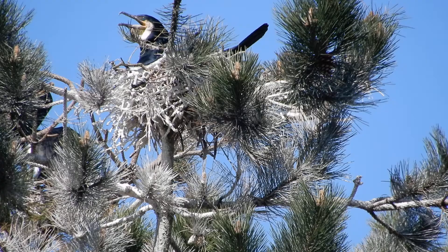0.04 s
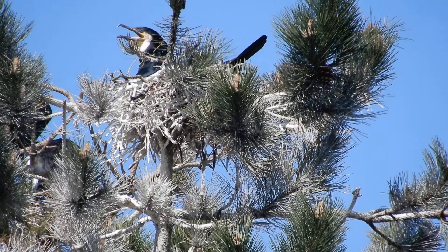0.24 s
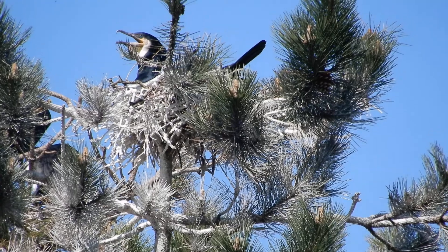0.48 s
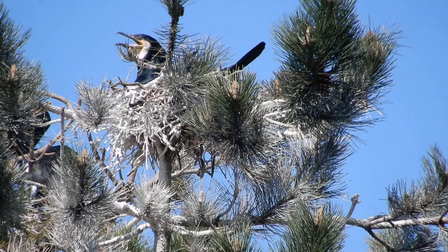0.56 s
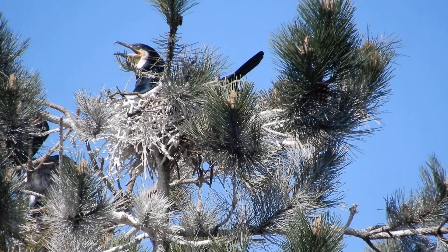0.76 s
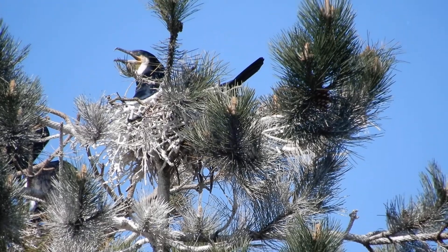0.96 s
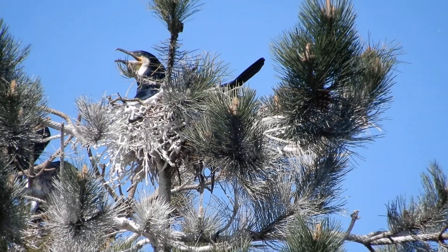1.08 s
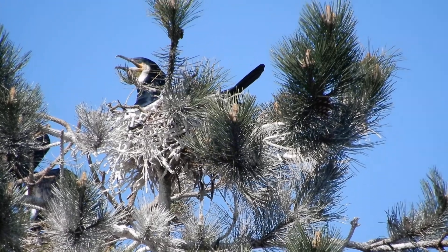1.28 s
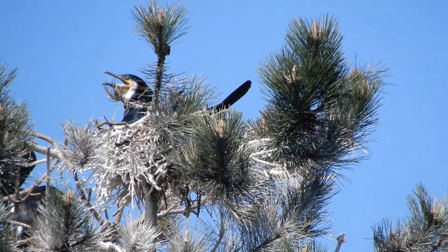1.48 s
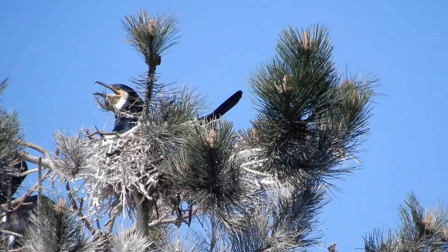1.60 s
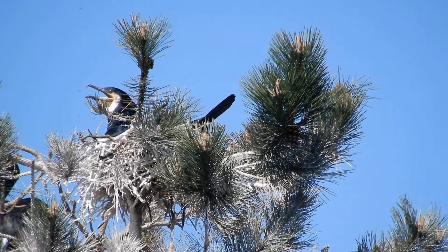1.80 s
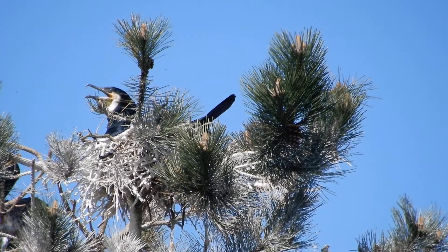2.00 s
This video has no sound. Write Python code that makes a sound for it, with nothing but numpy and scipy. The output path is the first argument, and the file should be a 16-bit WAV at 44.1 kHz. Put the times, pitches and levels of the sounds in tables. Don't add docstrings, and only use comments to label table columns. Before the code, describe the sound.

Wind buffeting dominates, low and fluttering, after a tiny click at the start. Behind it distant waterbirds croak in a quick row, then a softer row, over faint recorder whir, small handling ticks and thin bird peeps.

```python
import sys
import numpy as np
from scipy import signal
from scipy.io import wavfile
from scipy.ndimage import uniform_filter1d

SR = 44100
rng = np.random.default_rng(int(sys.argv[2]) if len(sys.argv) > 2 else 0)


def to_linear_factor(level_db):
    exponent = np.asarray(level_db, float) / 20
    return 10 ** exponent


def dump(signal):
    limited = np.clip(np.atleast_2d(signal).T, -1, 1)
    pcm = np.round(limited * 32767).astype(np.int16)
    wavfile.write(sys.argv[1], SR, pcm)


N = 90184

# centre_hz, width_hz, level_db
WHIR_MODES = [(889, 216, -61.5), (1244, 57, -73.5), (1920, 380, -72), (2509, 60, -72), (3873, 210, -66),
              (4120, 210, -85), (4540, 210, -87.5)]
# start_s, peak_db, sharpness_db, pan_db
HOUSING_TICKS = [(.3838, -50, -20, 1), (.8438, -36, -20, .5), (1.1885, -46, -18, -3), (1.511, -34, 10, 1),
                 (1.5136, -52, 8, -4), (1.5197, -44, -9, 1), (1.7405, -63, 6, 1), (1.76, -68, 6, 1),
                 (1.8095, -48, -25, 0), (2.029, -52, -12, 3), (2.037, -51, -10, 3)]
# mode_hz, level_db, t60_s
HOUSING_MODES = [(2070, -2.5, .005), (2830, -4, 0.0053), (4020, -12.5, 0.018), (4780, -0.5, 0.0031),
                 (6500, -6.5, 0.002), (8190, 1, 0.0032), (10500, -17, 0.0013), (12200, -23.5, .002)]
# start_s, peak_db
OPENING_CLICKS = [
    (.1365, -47),
    (.1421, -26),
    (.1526, -45),
    (.1632, -50),
    (.1737, -54),
]
# freq_hz, density_db_per_hz
RUSTLE_SPECTRUM = [(1000, -22), (1500, -11), (2300, -11.5), (3200, -11.5), (4500, -18.5), (6500, -27.5),
                   (10000, -29), (15600, -37)]
# time_s, level_db
RUSTLE_LEVEL = [(0.139, -1.5), (0.601, 3), (1.15, 3), (1.35, -6.5), (1.698, 1.5), (2.04, 1.5)]
# freq_hz, density_db_per_hz
WIND_SPECTRUM = [(20, -25.5), (45, 1.5), (85, 4.5), (130, 3), (220, 0.5), (330, -17.5), (480, -38.5),
                 (750, -40.5)]
# time_s, level_db
GUST_L = [(0.14, -17.5), (0.315, -25.5), (0.419, -17), (0.443, -21), (0.563, -15.5), (0.742, -24.5),
          (0.862, -22.5), (0.998, -19.5), (1.07, -20), (1.125, -24), (1.213, -12), (1.357, -18.5),
          (1.437, -17.5), (1.632, -21), (1.668, -14), (1.768, -31.5), (1.924, -37.5), (2.043, -8.5)]
GUST_R = [(0.14, -11.5), (0.411, -21.5), (0.467, -35), (0.527, -14), (0.73, -27), (0.774, -20.5),
          (0.938, -25.5), (0.966, -14), (1.078, -17.5), (1.481, -17.5), (1.525, -17), (1.676, -17.5),
          (1.764, -23), (1.788, -11), (1.828, -35.5), (1.9, -17.5), (1.972, -25.5), (2.043, -16.5)]
# start_s, peak_db
SLAPS_L = [(0.1592, -29), (0.176, -24.5), (0.1982, -13), (0.2124, -30.5), (0.8594, -15.5), (0.9028, -4),
           (0.9293, -16.5), (1.0669, -34), (1.1465, -28), (1.1596, -48.5), (1.1903, -32.5), (1.2136, -23.5),
           (1.2489, -20), (1.385, -28), (1.4381, -2.5), (1.494, 0), (1.5808, -13.5), (1.6705, -26.5),
           (1.681, -48.5), (2.0328, -3)]
SLAPS_R = [(0.2679, -12), (0.2841, -13), (0.344, -9), (0.5331, -19), (1.0423, -16.5), (1.1087, -9.5),
           (1.1251, -4.5), (1.1577, -8), (1.186, -10.5), (1.2387, -19.5), (1.268, -22.5), (1.2937, -9.5),
           (1.3368, -11.5), (1.3712, -12), (1.4771, -11), (1.674, -13), (1.6881, -21), (1.8971, -7.5),
           (2.019, -5.5), (2.0338, -2)]
# start_s, peak_db
MORE_SLAPS_L = [(0.269, -30), (0.347, -30.5), (0.412, -39), (0.502, -30), (0.539, -39.5), (.575, -52),
                (1.374, -19), (1.501, -14.5)]
MORE_SLAPS_R = [(0.188, -24.5), (0.41, -27), (0.67, -22.5), (0.772, -19.5), (.903, -31.5), (1.552, -29),
                (1.582, -18.5), (1.991, -15.5)]
# start_s, length_s, peak_db, start_hz, end_hz
SWIRLS_L = [(0.203, 0.019, -4.5, 193, 92), (0.518, 0.022, -4, 96.6, 164), (0.533, 0.057, -8, 118, 55.3),
            (0.851, 0.023, -6.5, 100, 167), (0.89, 0.03, -21, 101, 165.4), (0.938, 0.016, -7.5, 162, 72.8),
            (1.033, 0.062, -8, 110.7, 185), (1.192, 0.087, -9, 109, 86.7), (1.194, 0.016, -7.5, 284, 121.2),
            (1.213, 0.047, -17, 213.6, 161), (1.243, 0.04, -7.5, 84.9, 111.9),
            (1.423, 0.03, -11.5, 237.5, 234), (1.458, 0.046, -19, 213, 94),
            (1.657, 0.02, -11.5, 147.5, 236), (2.019, 0.021, -5, 218.4, 93.4), (2.02, 0.022, -2, 208, 287)]
SWIRLS_R = [(0.241, 0.1, -13, 122.9, 198), (0.255, 0.075, -16, 109, 88), (0.878, 0.04, -7.5, 160.7, 73),
            (0.925, 0.017, -3, 125.6, 129), (1.03, 0.022, -1.5, 214.7, 94), (1.065, 0.021, -4.5, 210, 94),
            (1.112, 0.026, -7, 281, 123), (1.153, 0.031, -6.5, 136, 235), (1.177, 0.025, -2, 155.3, 257),
            (1.188, 0.077, -6, 150.5, 190), (1.293, 0.06, -8.4, 172.8, 79), (1.365, 0.074, -10, 175.3, 110),
            (1.396, 0.065, -11.5, 256, 113), (1.45, 0.06, -12, 146, 190), (1.776, 0.021, -7, 242, 113),
            (2.018, 0.024, -4, 199.3, 334)]
# start_s, length_s, peak_db, start_hz, end_hz
CURLS_L = [
    (0.382, 0.025, -13.5, 91.4, 65.4),
    (.405, 0.023, -11, 203, 140.4),
    (.922, 0.027, -13.5, 320, 231),
    (1.59, .045, -18, 96.6, 60),
]
CURLS_R = [
    (0.253, .03, -15, 290, 349),
    (0.826, .05, -17, 90, 70),
    (1.598, .04, -15, 65, 130.6),
    (1.712, 0.029, -17, 240, 169),
]
# delay_s, level_db
TREE_ECHOES = [(.023, -21), (.047, -24), (.081, -27)]
# start_s, length_s, level_db, start_hz, end_hz
BIRD_WHISTLES = [
    (1.603, .042, -80, 7330, 7100),
    (1.665, .045, -87, 7300, 7100),
    (1.817, .05, -64, 4520, 4470),
    (1.879, .013, -68, 4450, 4380),
    (1.897, .022, -74, 4330, 4200),
    (1.975, .013, -62, 2950, 2990),
    (.368, .018, -75, 5300, 5290),
    (1.995, .03, -74, 4600, 4650),
]
# start_s, length_s, level_db, throat_hz, throat_width_hz
CROAK_CALLS = [(.551, .039, -48, 2060, 260), (.66, .043, -45, 2090, 260), (.766, .036, -46, 2100, 220),
               (.878, .036, -49, 2110, 220), (.952, .02, -62, 2100, 260), (1.122, .03, -58, 2020, 200),
               (1.224, .032, -56, 2170, 110), (1.318, .036, -57, 2080, 200), (1.424, .036, -55, 2000, 200),
               (1.536, .039, -54, 2060, 70), (1.672, .038, -56, 2100, 170), (1.814, .038, -58, 2130, 70)]
# centre_hz, width_hz, level_db
BILL_MODES = [(1010, 160, -11), (2480, 150, -11), (2880, 260, -8), (3400, 270, -11), (4000, 330, -15)]

TIME_S = np.arange(N) / SR
OPENS_S, OPENING_RAMP_S, CLOSING_S = .1405, 0.00067, .003
OPENING_PAN_DB, SETTLE_DB, SETTLE_S = -8, -69, .045
WHIR_THROB_DB, WHIR_THROB_HZ, WHIR_PAN_DB = 2, 40.2, 0.66
CONTACT_S, TICK_CUT_HZ = .0012, 12000
AIR_DB, AIR_LIKENESS, AIR_PAN_DB = -67.5, 0.35, -0.5
LUMP_DB, LUMP_TREBLE_DB, FLUTTER_DB, BRIGHTEN_DB, SKEW = 0.5, 1.97, 3, 0.42, 0.033
SHED_HZ, SHED_WANDER, SHED_DB, SHED_LUMP_DB = 140, .2, -4, 1.5
CHURN_S, CHURN_SHARE = .02, .28
SLAP_HZ, SLAP_T60_S, SLAP_DB = 391.5, 0.013, 1
SLAP_BODY_HZ, SLAP_BODY_DB = 207.8, 11.5
SWIRL_DB, SWIRL_OVERTONE_DB, RUMBLE_DB = 2, -18, 0
PORT_CUT_HZ, PORT_LOW_HZ, PORT_TOP = 652, 29.4, .88
PULSE_HZ, THROAT_RISE, JITTER, RASP, SWELL_DB = 215, .035, .12, .45, 4
CROAK_ATTACK_S, CROAK_RELEASE_S, CROAK_PAN_DB, DISTANCE_CUT_HZ = .015, .011, .7, 4100
BILL_FOLLOWS, BILL_PIVOT_DB, WIDE_THROAT_HZ = .45, -45, 260


def rms_one(x):
    return x / np.sqrt(np.mean(x ** 2) + 1e-20)


def drift(rate_hz):
    r = np.exp(-2 * np.pi * rate_hz * 20 / SR)
    white = rng.standard_normal(N // 20 + 2002)
    slow = signal.lfilter([1], [1, -2 * r, r * r], white)[2000:]
    return np.interp(np.arange(N) / 20, np.arange(len(slow)), rms_one(slow - slow.mean()))


def filtered(x, order, hz, kind="low"):
    return signal.sosfilt(signal.butter(order, hz, kind, fs=SR, output="sos"), x)


def resonance(x, hz, width_hz):
    r = np.exp(-np.pi * width_hz / SR)
    poles = [1, -2 * r * np.cos(2 * np.pi * hz / SR), r * r]
    return signal.lfilter(np.array([1, 0, -1]) * (1 - r * r) / 2, poles, x + 1e-18)


def ring(clicks, hz, t60_s):
    r, w = to_linear_factor(-60 / (t60_s * SR)), 2 * np.pi * hz / SR
    return signal.lfilter([0, np.sin(w)], [1, -2 * r * np.cos(w), r * r], clicks + 1e-18)


def sides(pan_db):
    return to_linear_factor(np.array([.5 * pan_db, -.5 * pan_db]))


def bands(white, spectrum, swing_db):
    hz_at, db_at = np.transpose(spectrum)
    count = int(2 * np.log2(hz_at[-1] / hz_at[0])) + 1
    edges_hz = np.geomspace(hz_at[0], hz_at[-1], count)
    out = 0
    for k, (low_hz, high_hz) in enumerate(zip(edges_hz, edges_hz[1:])):
        hz = np.sqrt(low_hz * high_hz)
        band = filtered(white[k % 2], 2, [low_hz, high_hz], "band")
        level_db = np.interp(np.log(hz), np.log(hz_at), db_at)
        out = out + band * to_linear_factor(level_db + swing_db(hz))
    return rms_one(out)


def swell(start_s, length_s, attack_s, release_s):
    i = int(start_s * SR)
    t = np.arange(min(int((length_s + release_s) * SR), N - i)) / SR
    rise = np.clip(t / attack_s, 0, 1)
    fall = np.clip((length_s + release_s - t) / release_s, 0, 1)
    return slice(i, i + len(t)), t / length_s, np.sin(.5 * np.pi * rise * fall) ** 2


def whir():
    out = np.zeros(N)
    for hz, width_hz, db in WHIR_MODES:
        narrow = resonance(resonance(rng.standard_normal(N), hz, width_hz), hz, 1.9 * width_hz)
        out += to_linear_factor(db + WHIR_THROB_DB * drift(WHIR_THROB_HZ)) * rms_one(narrow)
    return out * sides(WHIR_PAN_DB)[:, None]


def opening_clicks():
    start_s, db = np.transpose(OPENING_CLICKS)
    t = TIME_S - OPENS_S
    fade = np.exp(-np.abs(t) / SETTLE_S) * (t > 0)
    out = to_linear_factor(SETTLE_DB) * rng.standard_normal((2, N)) * fade
    out[:, (start_s * SR).astype(int)] += to_linear_factor(db) * sides(OPENING_PAN_DB)[:, None]
    return filtered(out, 4, 15000)


def ticks():
    start_s, db, sharp_db, pan_db = np.transpose(HOUSING_TICKS)
    chance = rng.standard_normal((len(start_s), len(HOUSING_MODES)))
    t = np.arange(int(CONTACT_S * SR)) / SR
    out = 0
    for k, (hz, mode_db, t60_s) in enumerate(HOUSING_MODES):
        strike_db = db + mode_db + sharp_db * (hz > 4500) + 1.5 * chance[:, k]
        clicks = np.zeros((2, N))
        clicks[:, (start_s * SR).astype(int)] = to_linear_factor(strike_db) * sides(pan_db)
        contact = np.hanning(len(t)) * np.cos(2 * np.pi * hz * t) * 4 / len(t)
        out = out + signal.lfilter(contact, [1], ring(clicks, hz, t60_s)) * (-1) ** k
    return filtered(out, 2, TICK_CUT_HZ)


def air():
    breeze = drift(9)

    def rustle():
        return bands(rng.standard_normal((2, N)), RUSTLE_SPECTRUM, lambda hz: 1.5 * drift(11) + 1.2 * breeze)

    mid = np.sqrt(1 + AIR_LIKENESS) * rustle()
    side = np.sqrt(1 - AIR_LIKENESS) * rustle()
    level_db = AIR_DB + np.interp(TIME_S, *np.transpose(RUSTLE_LEVEL))
    return to_linear_factor(level_db) * (mid + side * [[1], [-1]]) * sides(AIR_PAN_DB)[:, None]


def churn(slaps):
    start_s, db = np.transpose(slaps)
    at = np.arange(0, N, 100)
    near = np.exp(-((at[:, None] / SR - start_s) / CHURN_S) ** 2) @ to_linear_factor(db)
    near_db = 20 * np.log10(near + .01)
    return np.interp(np.arange(N), at, near_db - near_db.mean())


def rumble(level_db, slaps):
    lump = drift(25.3) + 0.88 * drift(65)
    push_db = level_db - level_db.mean()
    treble_db = LUMP_TREBLE_DB * lump + BRIGHTEN_DB * push_db + CHURN_SHARE * churn(slaps)

    def swing_db(hz):
        octaves = np.clip(np.log2(hz / 110), 0, 2.6)
        return LUMP_DB * lump + FLUTTER_DB * drift(6.95) + octaves * treble_db

    shed_hz = SHED_HZ * np.exp(SHED_WANDER * np.clip(drift(12.46), -2, 2))
    shed = np.sin(2 * np.pi * np.cumsum(shed_hz) / SR)
    noise = bands(rng.standard_normal((2, N)), WIND_SPECTRUM, swing_db)
    x = rms_one(noise + to_linear_factor(SHED_DB + SHED_LUMP_DB * drift(25.4)) * shed)
    x = x + SKEW * filtered(x * x, 2, 40, "high")
    return rms_one(x) * to_linear_factor(level_db + RUMBLE_DB)


def slap(slaps):
    start_s, db = np.transpose(slaps)
    clicks = np.zeros(N)
    clicks[(start_s * SR).astype(int)] = to_linear_factor(db + SLAP_DB)
    body = ring(clicks, SLAP_BODY_HZ, 0.96 * SLAP_T60_S)
    return ring(clicks, SLAP_HZ, SLAP_T60_S) + to_linear_factor(SLAP_BODY_DB) * body


def swirl(swirls):
    out = np.zeros(N)
    for start_s, length_s, db, start_hz, end_hz in swirls:
        half_s = .5 * length_s
        span, part, shape = swell(start_s, half_s, half_s, half_s)
        glide_hz = start_hz * (end_hz / start_hz) ** (.5 * part)
        phase = 2 * np.pi * (rng.random() + np.cumsum(glide_hz) / SR)
        cycles = np.cos(phase) + to_linear_factor(SWIRL_OVERTONE_DB) * np.cos(2 * phase)
        out[span] += to_linear_factor(db + SWIRL_DB) * shape * cycles
    return out


def wind():
    ports = []
    for gust, slaps, swirls in ((GUST_L, SLAPS_L + MORE_SLAPS_L, SWIRLS_L + CURLS_L),
                                (GUST_R, SLAPS_R + MORE_SLAPS_R, SWIRLS_R + CURLS_R)):
        level_db = np.interp(TIME_S, *np.transpose(gust))
        ports.append(rumble(level_db, slaps) + slap(slaps) + swirl(swirls))
    pressed = PORT_TOP * np.tanh(np.array(ports) / PORT_TOP)
    return filtered(filtered(pressed, 6, PORT_CUT_HZ), 1, PORT_LOW_HZ, "high")


def trees(x):
    dull = signal.lfilter([.5], [1, -.5], x)
    out = np.zeros((2, N))
    for side, stretch in enumerate((1, 1.13)):
        for delay_s, db in TREE_ECHOES:
            i = int(delay_s * stretch * SR)
            out[side, i:] += to_linear_factor(db) * dull[:N - i]
    return out


def whistles():
    out = np.zeros(N)
    for start_s, length_s, db, start_hz, end_hz in BIRD_WHISTLES:
        span, part, shape = swell(start_s, length_s, .3 * length_s, .3 * length_s)
        glide_hz = start_hz + (end_hz - start_hz) * part
        out[span] += to_linear_factor(db + 3) * shape * np.sin(2 * np.pi * np.cumsum(glide_hz) / SR)
    return out * to_linear_factor(3 * drift(90))


def syrinx(length):
    period = SR / PULSE_HZ
    at = np.cumsum(period * (1 + JITTER * rng.standard_normal(40))).astype(int) - int(.7 * period)
    heights = to_linear_factor(0.9 * rng.standard_normal(40))
    pulses = np.zeros(length)
    pulses[at[at < length]] = heights[at < length]
    gate = 0.073 + signal.lfilter([1], [1, -.985], pulses)
    return (1 - RASP) * rms_one(pulses) + RASP * rms_one(rng.standard_normal(length) * gate)


def throat(source, hz, width_hz, share):
    early, late = (resonance(resonance(source, hz * (1 + k * THROAT_RISE), width_hz), hz, 1.7 * width_hz)
                   for k in (-1, .5))
    return (1 - share) * early + share * late


def bill(source, level_db, throat_width_hz):
    out = 0
    for k, (hz, width_hz, db) in enumerate(BILL_MODES):
        passed = (throat_width_hz / WIDE_THROAT_HZ) ** (.5 + .5 * (hz > 2600))
        gain = to_linear_factor(db + BILL_FOLLOWS * (level_db - BILL_PIVOT_DB)) * passed
        out = out + gain * (-1) ** k * resonance(source, hz, width_hz)
    return out


def croaks():
    out = np.zeros(N)
    for start_s, length_s, db, throat_hz, width_hz in CROAK_CALLS:
        span, part, shape = swell(start_s - .5 * CROAK_ATTACK_S, length_s, CROAK_ATTACK_S, CROAK_RELEASE_S)
        share = np.clip(part, 0, 1)
        source = syrinx(len(part))
        voice = throat(source, throat_hz, width_hz, share)
        scale = np.sqrt(uniform_filter1d(voice ** 2, size=500) + 0.16 * np.mean(voice ** 2))
        voice = voice + bill(source, db, width_hz)
        out[span] += to_linear_factor(db + SWELL_DB * (share - 1.0)) * shape * voice / scale
    return filtered(out, 3, DISTANCE_CUT_HZ)


def scene():
    birds = croaks() + whistles()
    far = birds * sides(CROAK_PAN_DB)[:, None] + trees(birds)
    fade_in = np.clip((TIME_S - OPENS_S) / OPENING_RAMP_S, 0, 1)
    fade_out = np.clip((N - np.arange(N)) / SR / CLOSING_S + 0.34, 0, 1)
    return (wind() + far + whir() + air()) * fade_in * fade_out + ticks() + opening_clicks()


def band_limit(x):
    return signal.sosfilt(signal.butter(12, 15680, fs=SR, output="sos"), x)


def record(dry):
    return band_limit(dry)


dry = scene()
out = record(dry)
dump(out)
```